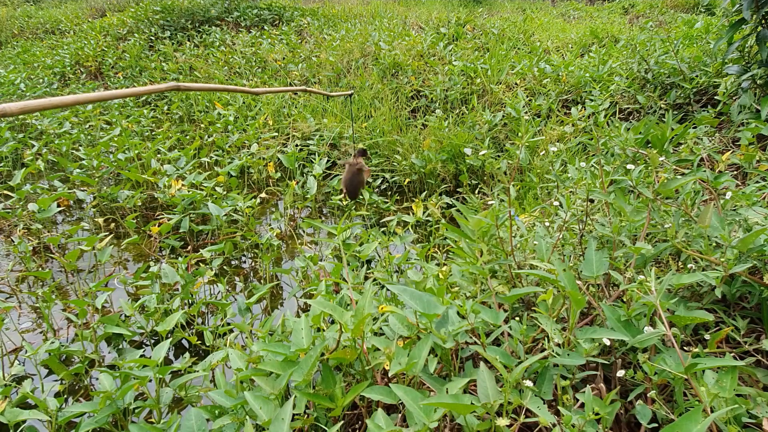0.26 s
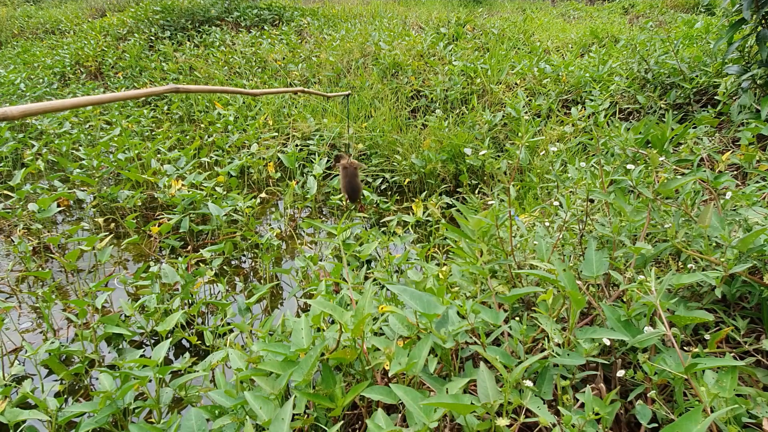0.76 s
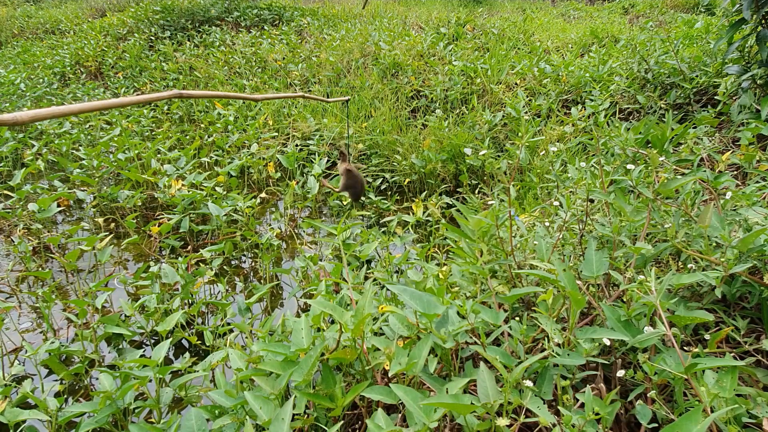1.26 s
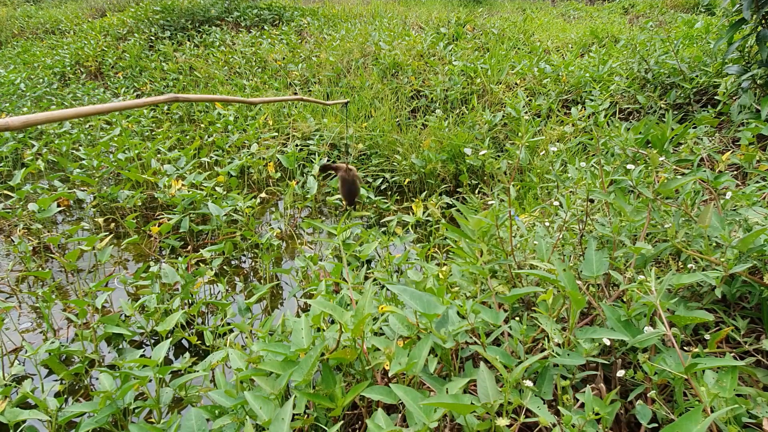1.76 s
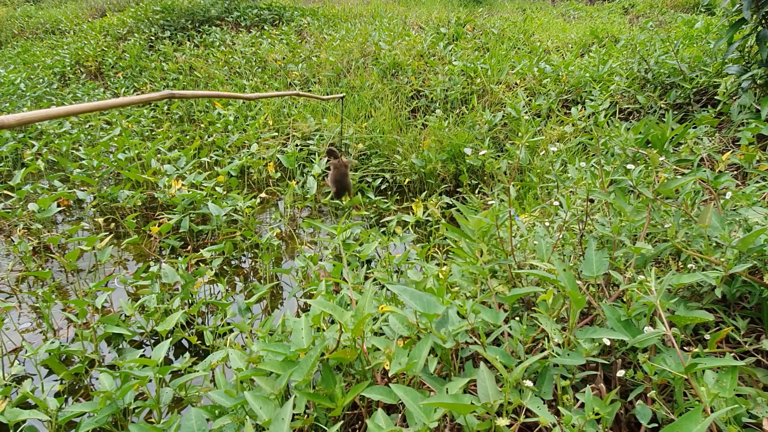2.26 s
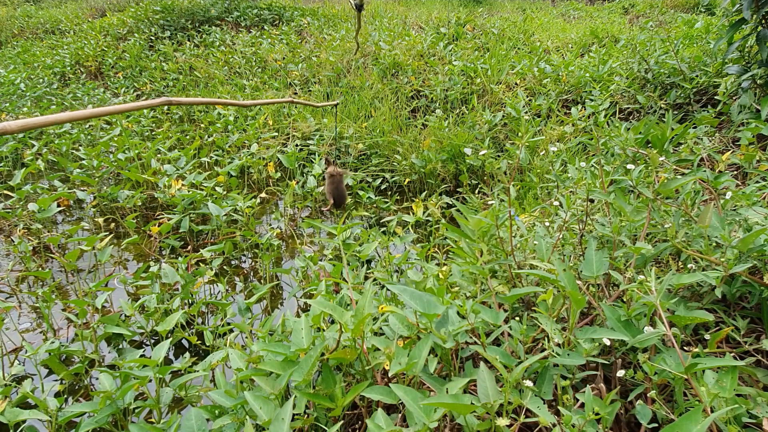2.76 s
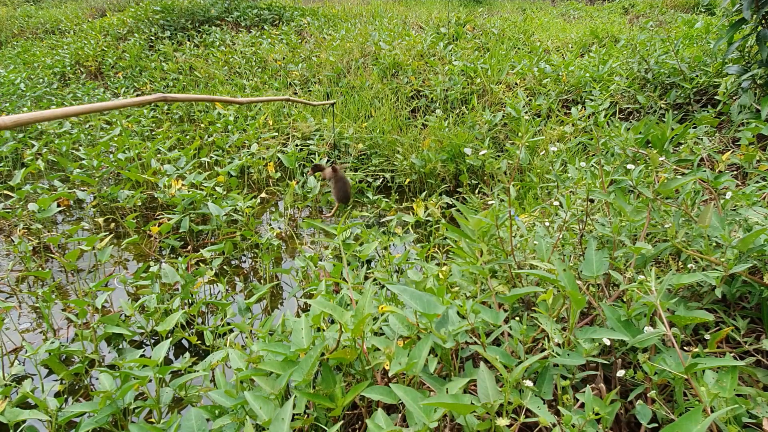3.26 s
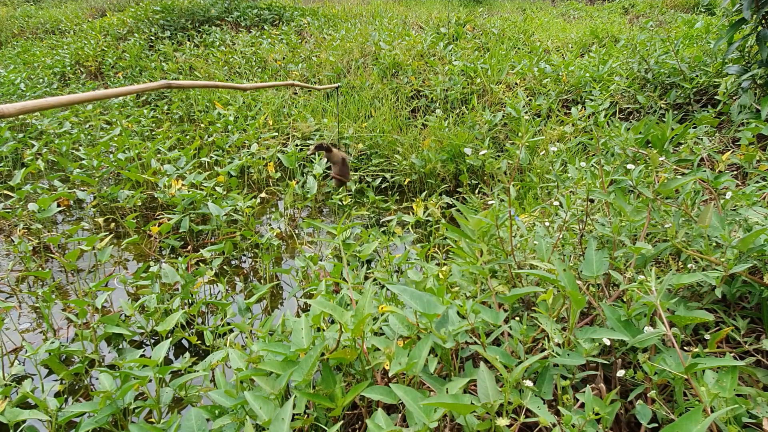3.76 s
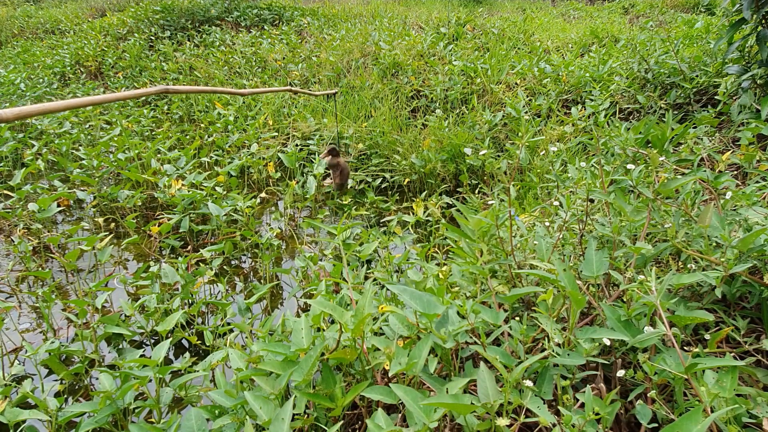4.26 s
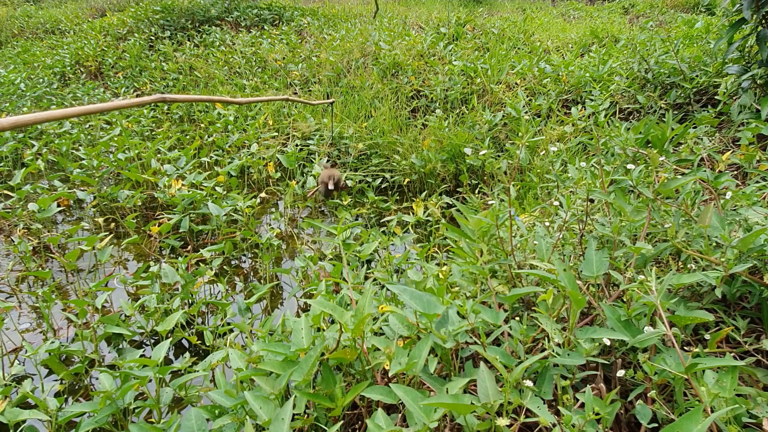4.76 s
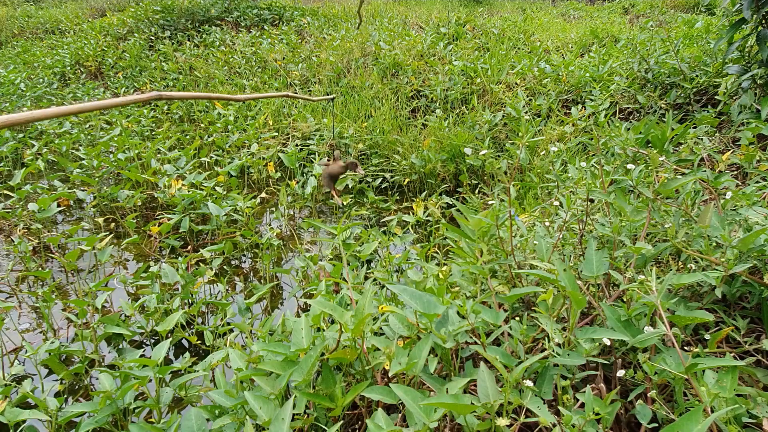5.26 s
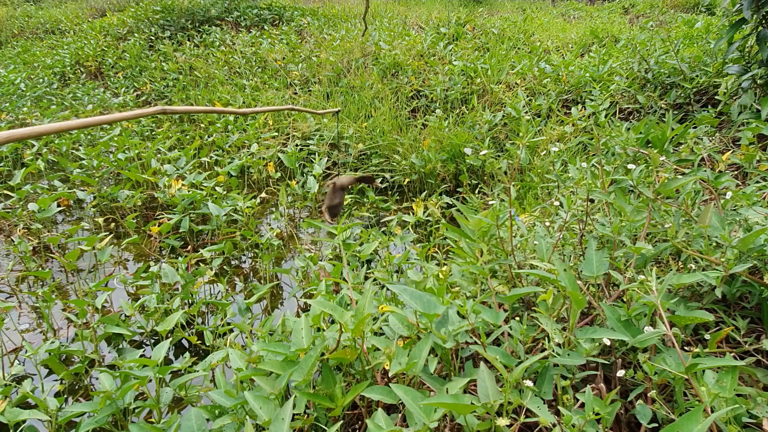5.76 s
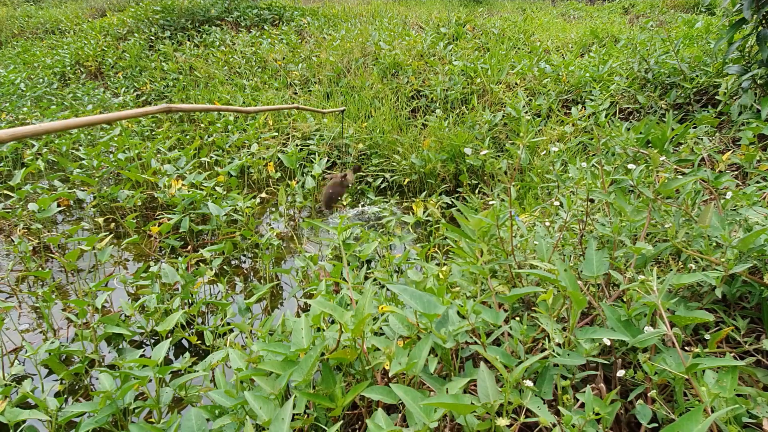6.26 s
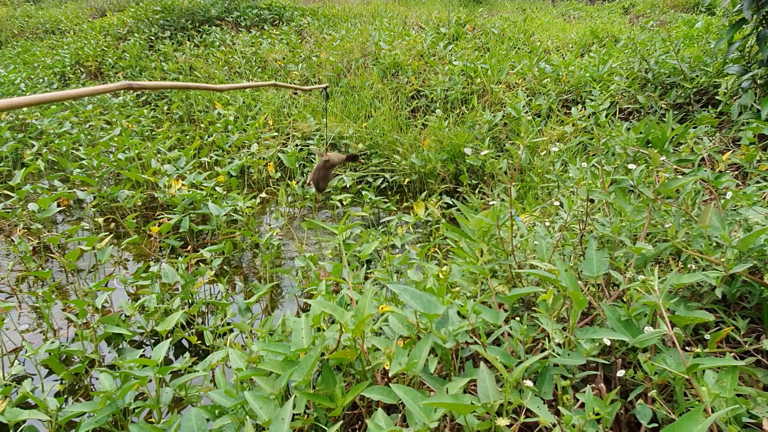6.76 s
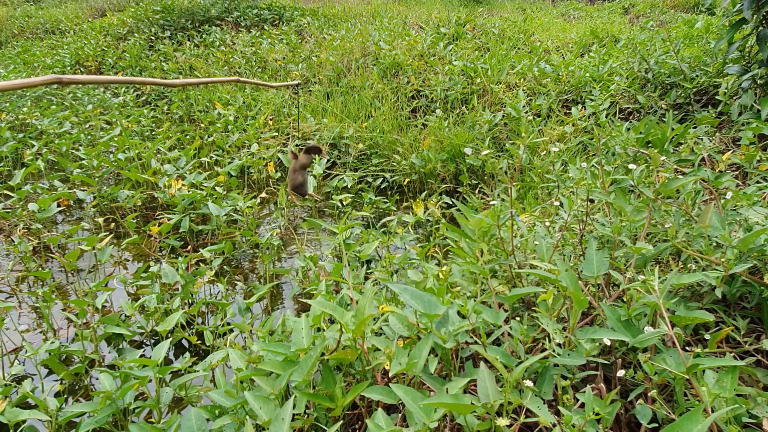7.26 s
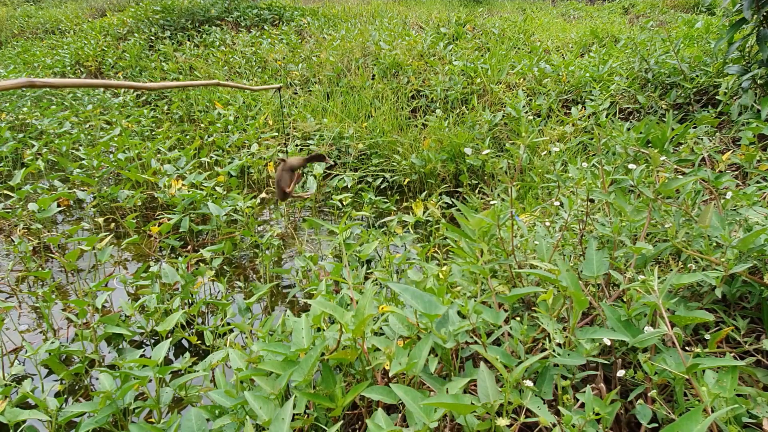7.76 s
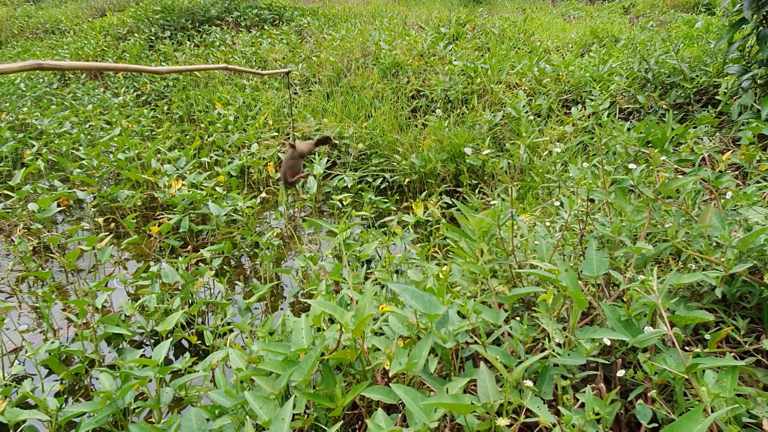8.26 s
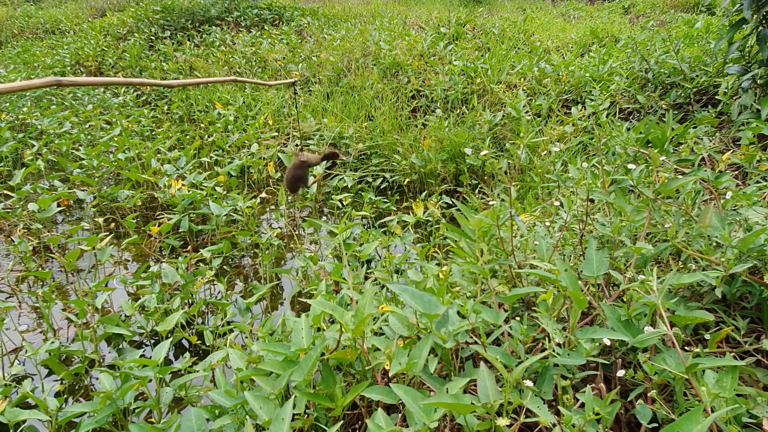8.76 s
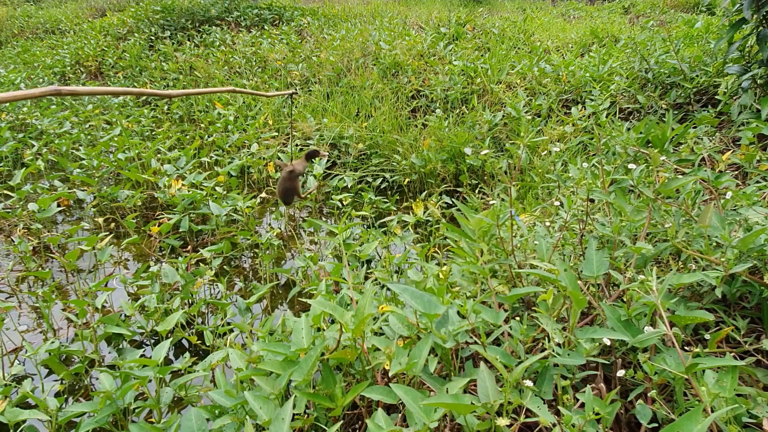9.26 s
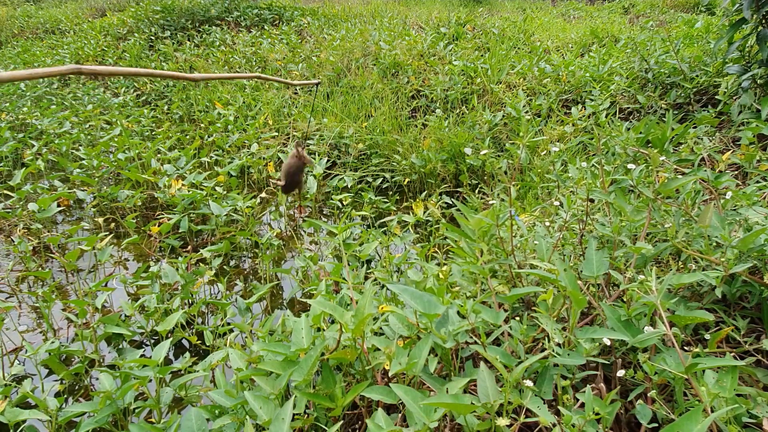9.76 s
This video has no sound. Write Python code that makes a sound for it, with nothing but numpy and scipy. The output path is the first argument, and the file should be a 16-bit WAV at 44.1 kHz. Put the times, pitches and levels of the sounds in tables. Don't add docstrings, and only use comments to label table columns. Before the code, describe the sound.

Small bird chirps faintly, then calls sharply beside a weedy pond, kicks up a quick splash, and quietens above a steady far-off road drone.

```python
import sys
import numpy as np
from scipy import signal
from scipy.fft import rfft, irfft
from scipy.io import wavfile
from scipy.ndimage import uniform_filter1d, minimum_filter1d

SR = 44100
rng = np.random.default_rng(int(sys.argv[2]) if len(sys.argv) > 2 else 0)


def to_linear_factor(level_db):
    exponent = np.asarray(level_db, float) / 20
    return 10 ** exponent


def to_wav(sig):
    pcm = np.clip(np.atleast_2d(sig), -1, 1) * 32767
    pcm = np.round(pcm).astype(np.int16)
    wavfile.write(sys.argv[1], SR, pcm.T)


N = 440559

# (time [s], length [s], from [Hz], to [Hz], level [dB])
CHIRPS = [(0.123, 0.038, 2200, 2740, -62), (1.731, .05, 1990, 2720, -66), (3.561, 0.054, 2140, 2730, -60),
          (6.598, 0.043, 2260, 2740, -64), (7.157, 0.037, 2050, 2750, -66), (7.272, .043, 2090, 2660, -65),
          (7.512, 0.0345, 2070, 3000, -63), (7.765, .03, 1960, 3070, -62), (8.783, .048, 1900, 2680, -65),
          (9.5, .028, 2045, 2400, -70), (9.566, .042, 1930, 2420, -64)]
# (time [s], length [s], low [Hz], top [Hz], level [dB])
WARBLES = [
    (0.218, 0.047, 2030, 2480, -61.5),
    (1.971, 0.057, 2200, 2860, -54),
    (3.481, 0.065, 2160, 2600, -65),
    (5.838, 0.052, 2250, 2520, -64),
    (5.92, 0.039, 2140, 2470, -58.5),
    (6.715, 0.044, 2200, 2590, -62),
    (7.351, 0.052, 1999, 2780, -60.5),
]
# (time [s], pitch [Hz], level [dB])
TRILLS = [
    [(.591, 2160, -70), (.626, 2510, -70), (.647, 2300, -68), (.685, 2530, -64), (.711, 2170, -64),
     (.745, 2600, -62), (.759, 2300, -72)],
    [(1.165, 2120, -72), (1.19, 2400, -68), (1.215, 2090, -69), (1.257, 2480, -62), (1.293, 2170, -62),
     (1.336, 2670, -60), (1.352, 2200, -72)],
    [(1.8, 2060, -68), (1.838, 2540, -62), (1.87, 2190, -58), (1.916, 2900, -66)],
    [(2.716, 2070, -62), (2.76, 2850, -72), (2.8, 2050, -67), (2.833, 2340, -57), (2.864, 2120, -66)],
    [(8.848, 2300, -74), (8.877, 1830, -67), (8.922, 2520, -64)],
    [(8.93, 2400, -66), (8.975, 1960, -62), (9.015, 2100, -64), (9.035, 1960, -66)],
    [(9.63, 2240, -68), (9.647, 2060, -64), (9.685, 2580, -63), (9.722, 1930, -74)],
]
# (time [s], pitch [Hz], level [dB])
FLAT_PEEPS = [
    [(3.3, 1730, -57), (3.311, 2014, -54.5), (3.325, 2557, -46), (3.35, 2890, -38), (3.378, 2940, -48)],
    [(5.312, 2520, -47), (5.324, 2620, -43), (5.346, 3150, -38.5), (5.36, 3391, -31.5), (5.374, 3690, -38),
     (5.391, 3575, -44), (5.405, 3810, -41.5)],
]
# (time [s], pitch [Hz], level [dB])
PEEPS = [
    [(2.337, 2200, -62), (2.372, 2380, -68), (2.392, 2683, -48), (2.417, 2786, -51.5)],
    [(3.613, 2290, -58), (3.64, 2480, -56), (3.659, 2790, -38), (3.674, 2500, -50.5), (3.706, 2810, -37.5)],
    [(4.264, 2550, -54), (4.275, 2820, -46), (4.311, 3360, -35.5), (4.341, 4080, -39), (4.364, 3800, -45.5),
     (4.377, 3310, -43)],
    [(6.116, 2463, -54), (6.131, 2795, -41), (6.147, 2753, -42.5), (6.171, 2950, -40), (6.196, 2990, -46)],
    [(7.878, 2260, -54), (7.892, 2570, -49), (7.914, 2634, -45), (7.933, 2740, -41.5), (7.952, 2660, -49)],
]
# (time [s], pitch [Hz], level [dB])
CRIES = [
    [(3.95, 2850, -50), (3.958, 3050, -54), (3.973, 3080, -38), (3.99, 3275, -39.5), (4.008, 3200, -36),
     (4.025, 3160, -39.5), (4.04, 2880, -34.5)],
    [(4.62, 2280, -60), (4.638, 2850, -42), (4.646, 2980, -33), (4.661, 3200, -38), (4.668, 3350, -30),
     (4.674, 3455, -23.5), (4.688, 3640, -36), (4.699, 3680, -56), (4.716, 3420, -30), (4.732, 2850, -37)],
    [(4.96, 2780, -59), (4.975, 3415, -36), (4.99, 3570, -32), (5.02, 3400, -36), (5.043, 3270, -41),
     (5.05, 2900, -58)],
    [(5.732, 2150, -54), (5.745, 2770, -57), (5.765, 2860, -49), (5.787, 3030, -51), (5.812, 2880, -39),
     (5.824, 2800, -47), (5.835, 2900, -44)],
]
# (length [s], pitch ratio, level [dB])
SCOOP = (.013, .76, -15)
FLAT_FOOT = (.015, 1.03, -6)
DROP = (.013, .62, -30)
STOP = (.008, .97, -18)
# (time [s], length
# [s], from [Hz], to [Hz], level at the low end [dB])
STRANDS = [(2.372, 0.053, 3100, 3640, -63), (3.62, 0.033, 2800, 3180, -57.5), (3.7, 0.032, 2240, 2260, -61),
           (3.95, 0.039, 3300, 4050, -53), (3.988, 0.054, 4000, 3250, -42),
           (3.96, 0.061, 3950, 4520, -50.5), (4.648, 0.017, 3300, 3500, -38),
           (4.693, .017, 3780, 4250, -48.5), (4.708, .014, 4220, 3600, -46), (4.721, .014, 3550, 3150, -38),
           (4.958, .022, 3520, 3440, -47), (4.985, .066, 3900, 3520, -39), (4.97, 0.033, 4060, 4450, -59),
           (5.297, 0.016, 3040, 2830, -55), (5.33, 0.024, 3220, 3350, -40.5), (5.755, .03, 3250, 3700, -58),
           (5.78, .048, 3720, 3520, -54), (5.765, .055, 4300, 4130, -65), (6.12, 0.026, 3150, 3180, -52),
           (6.145, 0.061, 3180, 3850, -44.5), (6.48, .019, 1400, 1800, -52), (6.501, .012, 1700, 1800, -55),
           (6.568, .01, 1700, 2700, -46), (6.445, .03, 950, 1350, -62), (4.69, .025, 3500, 3100, -50),
           (5.822, .016, 3500, 3850, -55), (7.9, 0.051, 2950, 3220, -59.5), (5.75, .065, 2050, 2350, -68),
           (3.62, .03, 2300, 2050, -62), (4.285, .04, 3300, 3650, -50)]
# (time [s], length [s], from [Hz], to [Hz], level at the low end [dB])
RASPS = [(4.308, .035, 4350, 4450, -50), (4.33, .035, 4450, 4700, -56), (4.68, .035, 5000, 5300, -58),
         (4.338, .03, 4500, 5150, -55), (4.665, .058, 4430, 4800, -49), (5.365, 0.037, 4360, 4500, -61)]
OVERTONES_DB = [-24, -28, -41]
# (time [s], lift [dB])
BEAK = [(2.4, -3), (3.34, -6), (3.365, 6), (3.66, -5), (3.98, 4), (4.03, 4), (4.3, -1), (4.36, -3),
        (4.65, -2), (4.7, 0), (5.0, 5), (5.34, -5), (5.4, 3), (5.735, 0), (5.76, 16), (5.782, -6),
        (5.815, -2), (6.15, 0), (7.9, -8)]
# (time [s], extra left minus right [dB])
DRIFT = [
    (5.3, 2),
    (7.5, -1.5),
]
# (time [s], peak [dB], pitch [Hz], ring time [ms])
BUBBLES = [(6.2085, -45, 3300, .6), (6.222, -40, 2020, 2.5), (6.2255, -33, 3300, 1.6),
           (6.2255, -42, 6800, 1.5), (6.232, -45, 2200, 2), (6.2365, -36, 2240, 2.4),
           (6.2415, -43, 1000, .8), (6.2415, -46, 3400, .5), (6.2475, -38, 3950, 2.4),
           (6.255, -32, 1180, 3), (6.2615, -35, 1200, 2.4), (6.266, -46, 1900, 3), (6.279, -42, 2800, 2.5),
           (6.284, -32, 816, 4), (6.29, -38, 860, 3), (6.284, -45, 1900, 1), (6.289, -44, 4450, 3),
           (6.297, -44, 2400, 2), (6.298, -36, 800, 3), (6.305, -41, 900, 4), (6.309, -42, 3600, .6),
           (6.313, -43, 1050, 4), (6.316, -44, 3700, .6), (6.3185, -41, 5400, 1.2), (6.32, -39, 2000, 1.5),
           (6.322, -39, 6300, 2), (6.327, -45, 3700, 2), (6.339, -46, 3700, 1), (6.346, -40, 1800, 2.5),
           (6.3675, -39, 1240, 5), (6.393, -29, 1900, 2.5), (6.393, -39, 4300, 1.5), (6.3935, -41, 6700, 2),
           (6.404, -44, 3900, 1.5), (6.4105, -41, 3500, .7), (6.413, -44, 4000, 2), (6.419, -32, 3200, .2),
           (6.435, -45, 2800, 2.5), (6.4392, -33, 4800, .25), (6.44, -42, 3370, 2), (6.474, -48, 3500, 1),
           (6.479, -40, 1510, 2.5), (6.5155, -48, 4400, .7), (6.546, -52, 6000, 3), (6.562, -49, 3200, 2),
           (6.605, -47, 2760, 1.5)]
# (time [s], level [dB])
SPRAY = [
    (6.2, -63),
    (6.225, -52),
    (6.27, -48),
    (6.321, -46),
    (6.36, -56),
    (6.395, -43.5),
    (6.445, -57),
    (6.47, -60),
    (6.63, -69),
]
# (time [s], peak [dB])
TICKS = [(0.551, -56), (0.851, -52), (1.085, -52), (1.1157, -57), (1.1362, -54), (1.4972, -53),
         (1.8512, -51.5), (2.0429, -54.5), (2.2168, -52), (3.197, -49.5), (3.517, -55.5), (3.6809, -52),
         (3.8334, -50), (4.229, -54), (4.589, -57), (4.5955, -57), (3.92, -56), (4.978, -52), (5.754, -56),
         (4.6345, -56), (4.6432, -39), (4.7593, -52), (4.771, -57), (4.8233, -55), (5.4993, -53.5),
         (5.9496, -56), (6.225, -45), (6.317, -46), (6.3928, -40), (6.439, -47), (6.5, -49),
         (6.5798, -48.5), (6.476, -50), (6.516, -52), (6.563, -51)]
# (time [s], peak [dB])
SNAPS = [
    (4.6432, -37),
    (4.7605, -58),
    (6.226, -50),
    (6.25, -46),
    (6.3685, -49),
    (6.394, -45),
]
# (frequency [Hz], level [dB], left minus right [dB], left leads by [rad])
PORTS = [(500, 5, 0, -0.6), (900, 2, 2, -.5), (1420, -2.5, 7, 0.35), (2600, 2.5, 0.5, 1.25),
         (3500, -2.5, 4.5, 1.08), (6560, -3.5, 5.5, 1.54), (7720, -7, 7, 1.7), (8400, -25, 8.5, 0.38),
         (8900, -30, 10, 1), (9400, -16, 12, 1.5), (10300, -17.5, 14, 1.9), (15500, -11.5, 9.5, 1.1)]
# (time [s], pitch [Hz], level [dB])
DRONE = [(2, 164.9, -67), (3.3, 170, -58.5), (4.5, 178, -56), (6.8, 184, -58), (8, 186, -66)]
WHINE = [(2.2, 322, -66), (2.8, 337, -58), (4.2, 347, -61), (4.9, 358, -70)]
SECOND_WHINE = [(3, 312, -68), (4.3, 322, -63), (5.5, 331, -63), (7.3, 337, -58.5), (9.4, 340, -68)]
HUM = [(3, 145, -62.5), (5.5, 152, -56), (7, 152, -61.5), (10, 158, -59)]
# (time [s], pitch [Hz], level [dB])
CLIMBS = [
    [(6.2, 105, -66), (6.8, 122.1, -51), (7.5, 149.6, -56.5), (7.8, 156, -66)],
    [(8.0, 97.2, -63), (8.6, 111.2, -60), (10, 134.7, -65)],
]
# (centre [Hz], width [octaves], nearest [s], lasts [s], level [dB])
ROARS = [
    (307, 0.28, 3.48, 1.3, -64),
    (307, 0.25, 7.19, 0.87, -64.5),
    (670, 0.37, 9.2, 1.53, -74),
    (1177, 0.18, 9.65, 1.25, -75),
    (790, .1, 1.2, .45, -75),
]
# (time [s], level [dB])
SWELL = [(0, -48.5), (3.5, -45.5), (7, -45), (8.2, -45.5), (10, -43.5)]
# (frequency [Hz], level [dB])
AIR = [(20, -28), (40, -13), (64, 1.5), (153, -5.5), (334, -20.5), (420, -25), (700, -23.5), (2220, -30),
       (5200, -37.5), (6050, -37), (7400, -45), (8300, -66), (9700, -67.5), (10600, -60), (15600, -52.5)]
# (frequency [Hz], likeness from -1 to 1)
LIKENESS = [(25, 0.23), (60, 0.89), (130, 1), (290, 0.54), (640, -0.53), (1410, -0.57), (3100, 0.05)]

TIME = np.arange(N) / SR


def duckling(shimmer_db=2, breath_db=-31, overtone_flicker_db=4):
    out = np.zeros(N)
    wobble = walk(250)
    flicker_db = shimmer_db * walk(200)
    breath = to_linear_factor(breath_db) * band(6900, 1.1)
    grit = to_linear_factor(overtone_flicker_db * walk(350))
    beak_db = np.interp(TIME, *np.transpose(BEAK))

    first = [note(row, sweep, soft=True) for row in CHIRPS]
    first += [note(row, arch, soft=True) for row in WARBLES]
    first += [trill(turns) for turns in TRILLS]
    first += [peep(held, FLAT_FOOT, DROP) for held in FLAT_PEEPS]
    first += [peep(held, SCOOP, STOP) for held in PEEPS]
    first += [peep(held, SCOOP, DROP) for held in CRIES]
    second = [note(row, sweep, soft=False) for row in STRANDS]
    rasps = [note(row, sweep, soft=False) for row in RASPS]

    # its calls, its pitch jitter [Hz], its overtone level [dB]
    voices = [(first, 18 * wobble + 12 * walk(900), 0),
              (second, 45 * wobble + 55 * walk(900), -9),
              (rasps, 110 * walk(1200) + 90 * wobble, -9)]
    for calls, jitter_hz, rich_db in voices:
        for rows in calls:
            start, fade, (hz, db) = track(rows, 0.0015)
            span = slice(start, start + len(hz))
            phase = 2 * np.pi * np.cumsum(hz + jitter_hz[span]) / SR
            hold = int(0.03 * SR)
            push_db = uniform_filter1d(-minimum_filter1d(-db, hold), hold) - 2
            effort = to_linear_factor(0.3 * (push_db + 36))
            rough = to_linear_factor(beak_db[span] + rich_db) * grit[span] * overtones(phase + 0.22 * wobble[span])
            rough = rough + effort ** 2 * breath[span]
            whistle = to_linear_factor(db + flicker_db[span]) * np.sin(phase)
            voice = whistle + to_linear_factor(0.6 * push_db + 0.4 * db) * effort * rough
            add(out, start, np.sqrt(2) * fade * voice)
    return out


def overtones(phase):
    total = sum(to_linear_factor(db) * np.sin(k * phase) for k, db in enumerate(OVERTONES_DB, start=2))
    place = np.arange(len(phase))
    from_end_s = np.minimum(place, place[::-1]) / SR
    return total * np.clip(from_end_s / 0.022, 0, 1) ** 2


def note(row, path, soft):
    s, length, first, last, db = row
    share = np.linspace(0, 1, num=16)
    hz = first + (last - first) * path(share)
    if soft:
        khz = (hz - 2300) / 1000
        loss_db = np.where(khz > 0, 21, -13.5) * khz
    else:
        loss_db = 9.5 * (hz - hz.min()) / 1000
    return np.transpose([s + length * share, hz, db - loss_db + note_edges_db(share)])


def note_edges_db(share):
    edge_db, edge_share = -5, 0.24
    return edge_db * np.clip(1 - np.minimum(share, 1 - share) / edge_share, 0, 1)


def sweep(share):
    return np.sin(np.pi / 2 * share ** 1.2)


def arch(share):
    return np.sin(np.pi * share ** 1.5)


def trill(turns):
    s, hz, db = np.transpose(turns)
    t = np.arange(s[0], s[-1], 1 / 500)
    index = np.arange(len(s))
    place = np.interp(t, s, index)
    eased = np.floor(place) + (1 - np.cos(np.pi * (place % 1))) / 2
    softer_db = -1.5
    return np.transpose([t, np.interp(eased, index, hz), np.interp(t, s, db) + softer_db])


def peep(held, onset, ending):
    s0, hz0, db0 = held[0]
    s1, hz1, db1 = held[-1]
    on_s, on_ratio, on_db = onset
    end_s, end_ratio, end_db = ending
    foot = (s0 - on_s, hz0 * on_ratio, db0 + on_db)
    knee = (s1 + 0.25 * end_s, hz1 * (1 - 0.25 * (1 - end_ratio)), db1 + 0.55 * end_db)
    tail = (s1 + end_s, hz1 * end_ratio, db1 + end_db)
    return [foot, *held, knee, tail]


def splash(hiss_db=-13, droplet_db=2, scatter_db=18):
    out, spray = np.zeros(N), np.zeros(N)
    for s, db, hz, ring_ms in BUBBLES:
        add(out, int(s * SR), to_linear_factor(db) * bubble(hz, ring_ms / 1000))
    out *= to_linear_factor(2.5 * walk(400))

    s, db = np.transpose(SPRAY)
    for when, pitch, size, cycles in rng.random(size=(500, 4)):
        hz = 1600 * 2 ** (2.3 * pitch)
        drop = bubble(hz, (1 + 3 * cycles) / hz)
        start = int((s[0] + when * np.ptp(s)) * SR)
        add(spray, start, to_linear_factor(droplet_db - scatter_db * size) * drop)
    gust_db = 3 * walk(250)
    for hz in (1500, 2600, 4500, 7500, 12000):
        spray += to_linear_factor(hiss_db + gust_db + 4 * walk(150)) * band(hz, 0.7)
    return out + to_linear_factor(np.interp(TIME, s, db, -120, -120)) * spray


def bubble(hz, ring_s, glide=0.0082, rise=0.3):
    t = np.arange(SR // 20) / SR
    shape = (1 - np.exp(-t / (rise * ring_s))) * np.exp(-t / ring_s)
    tone = np.sin(2 * np.pi * hz * t * (1 + glide * t / ring_s))
    return tone * shape / shape.max()


def ticks(fade_s=0.0031, rustle_db=-58.5):
    out = np.zeros(N)
    t = np.arange(SR // 20) / SR
    dry_noise = band(4100, 1.0) + to_linear_factor(-13) * band(12000, 0.6)
    bright_noise = band(12000, 0.4)
    bursts = [(s, db, fade_s, dry_noise) for s, db in TICKS]
    for when, size in rng.random(size=(80, 2)):
        bursts.append((7 * when, rustle_db - 6 * size, fade_s + 0.023 * size, dry_noise))
    bursts += [(s, db, 0.0025, bright_noise) for s, db in SNAPS]
    for s, db, decay_s, noise in bursts:
        start = int(s * SR)
        add(out, start, to_linear_factor(db) * np.exp(-t / decay_s) * noise[start:start + len(t)])
    return out


def scatter(near):
    t = np.arange(SR // 10) / SR
    echoes = rng.standard_normal(len(t)) * np.exp(-t / 0.031) * (t > 0.003)
    return to_linear_factor(-51) * signal.fftconvolve(near, echoes)[:N]


def ports(near):
    db, pan_db, lead = curve(PORTS, np.fft.rfftfreq(N, 1 / SR))
    half = to_linear_factor(pan_db / 2) * np.exp(0.5j * lead)
    pair = np.array([half, 1 / half])
    return irfft(rfft(near) * to_linear_factor(db) * pair, N)


def engines():
    out = np.zeros((2, N))
    low_lead, high_lead = 0.2, 1.1
    sources = [(rows, low_lead) for rows in (DRONE, HUM, *CLIMBS)]
    sources += [(rows, high_lead) for rows in (WHINE, SECOND_WHINE)]
    for rows, lead in sources:
        start, fade, (hz, db) = track(rows, 0.26)
        span = slice(start, start + len(hz))
        phase = 2 * np.pi * np.cumsum(hz * (1 + 0.003 * walk(5)[span])) / SR
        gain = np.sqrt(2) * fade * to_linear_factor(db + 1.6 * walk(6)[span])
        out[:, span] += gain * np.sin(phase + np.array([[lead], [-lead]]))
    return out


def tyres():
    out = 0
    for hz, octaves, nearest_s, lasts_s, db in ROARS:
        gain = to_linear_factor(db + 1.2 * walk(5)) / (1 + ((TIME - nearest_s) / lasts_s) ** 4)
        opposed = band(hz, octaves) * np.array([[1], [-1]])
        out = out + gain * (band(hz, octaves) + 0.86 * opposed)
    return out


def air():
    out = 0
    s, db = np.transpose(SWELL)
    swell_db = np.interp(TIME, s, db - np.mean(db))
    for hz in 25 * 2 ** np.arange(0, 9.5, 0.5):
        like = np.clip(curve(LIKENESS, hz)[0], -0.99, 0.99)
        mid = np.sqrt(1 + like) * band(hz, 0.45)
        side = np.sqrt(1 - like) * band(hz, 0.42)
        swell_share = 1 / (1 + hz / 700) - hz / 30000
        gain = np.sqrt(hz) * to_linear_factor(swell_db * swell_share + 1.42 * walk(6))
        out = out + gain * np.array([mid + side, mid - side])
    colour_db = curve(AIR, np.fft.rfftfreq(N, 1 / SR))[0]
    out = irfft(rfft(out) * to_linear_factor(colour_db), N)
    return out * to_linear_factor(-47.5) / np.std(out)


def curve(points, hz):
    knots, *columns = np.transpose(points)
    return [np.interp(np.log(hz + 1), np.log(knots), c) for c in columns]


def walk(rate):
    k = int(SR / rate)
    steps = np.repeat(rng.standard_normal(N // k + 1), k)
    return 1.3 * uniform_filter1d(uniform_filter1d(steps, k), k)[:N]


def track(rows, round_s):
    s, *columns = np.transpose(rows)
    start = int(s[0] * SR)
    t = np.arange(start, min(int(s[-1] * SR), N)) / SR
    fade = np.clip(np.minimum(t - t[0], t[-1] - t) / round_s, 0, 1)
    size = int(round_s * SR)
    return start, fade, [uniform_filter1d(np.interp(t, s, c), size, mode="nearest") for c in columns]


def band(hz, octaves):
    f = np.fft.rfftfreq(N, 1 / SR)
    bell = np.exp(-(np.log2((f + 1) / hz) / octaves) ** 2)
    x = irfft(rfft(rng.standard_normal(N)) * bell, N)
    return x / np.std(x)


def add(out, start, x):
    out[start:start + len(x)] += x[:N - start]


def scene():
    near = to_linear_factor(3) * duckling() + to_linear_factor(2) * splash() + to_linear_factor(2) * ticks()
    pan_db = np.interp(TIME, *np.transpose(DRIFT))
    near_pair = ports(near + scatter(near)) * to_linear_factor(np.array([pan_db, -pan_db]) / 2)
    return near_pair + engines() + tyres() + air()


def top_cut(x):
    return signal.sosfilt(signal.butter(12, 15700, fs=SR, output="sos"), x)


def record(dry):
    return top_cut(dry)


dry = scene()
out = record(dry)
to_wav(out)
```